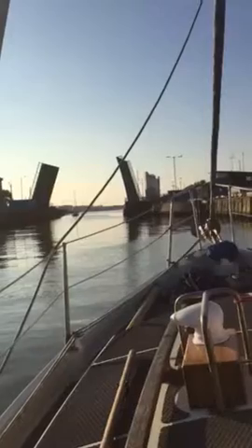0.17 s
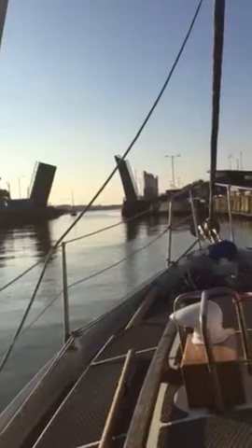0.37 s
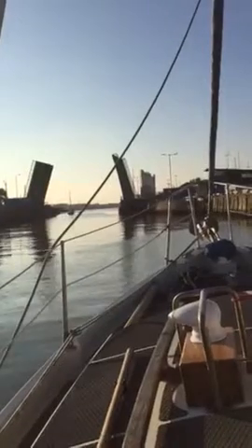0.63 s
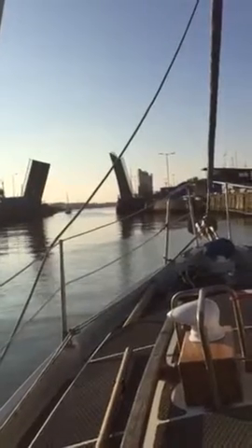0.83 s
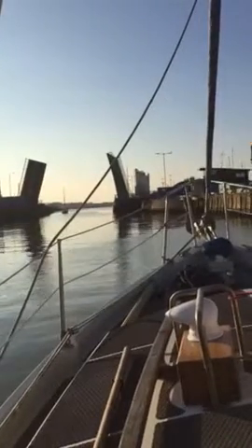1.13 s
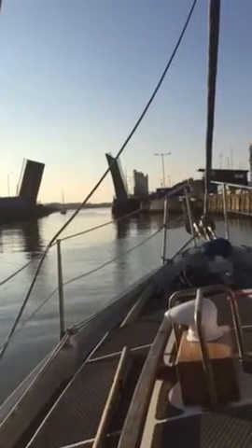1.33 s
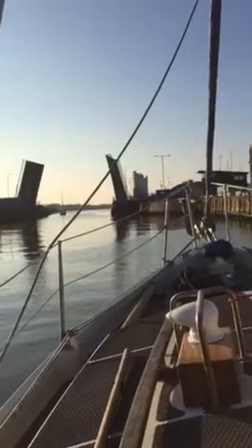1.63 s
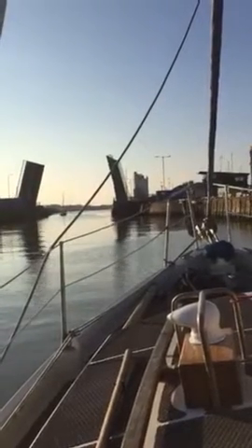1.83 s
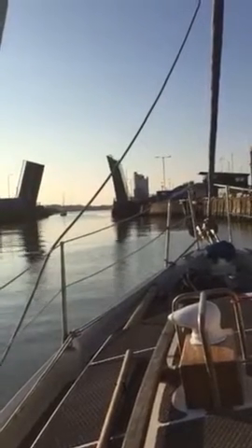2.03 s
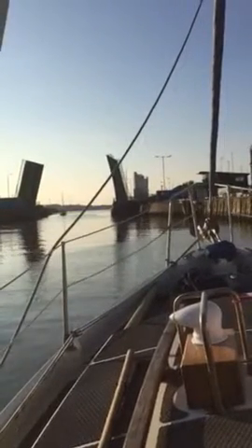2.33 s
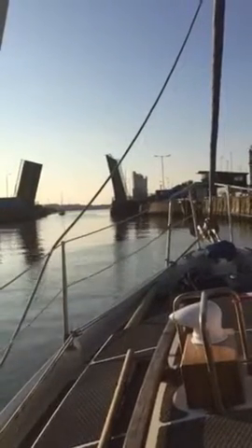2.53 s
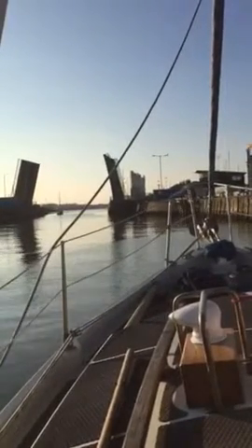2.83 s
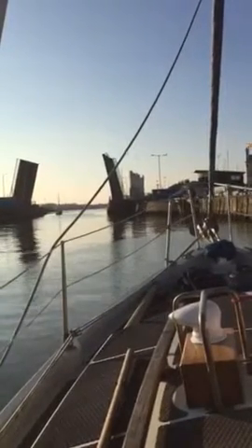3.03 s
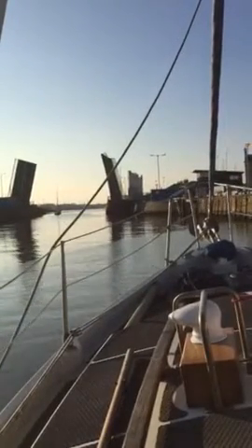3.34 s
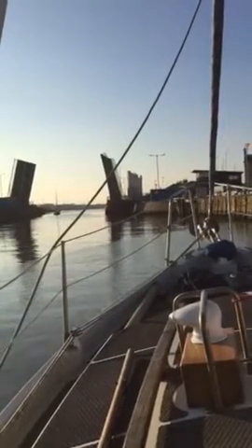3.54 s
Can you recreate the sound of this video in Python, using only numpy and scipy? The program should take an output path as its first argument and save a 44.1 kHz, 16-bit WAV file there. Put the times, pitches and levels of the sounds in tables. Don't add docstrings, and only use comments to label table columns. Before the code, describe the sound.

A small diesel rumbles low under a sailing boat's deck, knocking lightly, revs once near the middle, spits a little water and settles back; open calm harbour, one microphone on deck.

```python
import sys
import numpy as np
from scipy import signal
from scipy.fft import rfft, irfft, next_fast_len
from scipy.io import wavfile
from scipy.ndimage import uniform_filter1d, map_coordinates

SR = 44100
rng = np.random.default_rng(int(sys.argv[2]) if len(sys.argv) > 2 else 0)


def store_pcm(level_fs):
    pcm = np.round(np.clip(level_fs, -1, 1) * 32767).astype(np.int16)
    wavfile.write(sys.argv[1], SR, np.atleast_2d(pcm).T)


def voltage_ratio(decibels):
    exponent = np.asarray(decibels, float) / 20
    return 10 ** exponent


N = 162729

# [t/s, firing rate/Hz, exhaust level/dB, bark on upper orders/dB]
ENGINE = [(0, 22.1, -1, -3), (.1, 22.2, -1, -4), (.48, 23.5, 0, 0), (1.1, 23.8, -1, 0), (1.26, 29.3, -2, 0),
          (1.4, 33.6, 0, 4), (1.54, 39.9, -1, 8), (1.66, 44.7, -1, 8), (1.76, 47.4, 2.5, -1),
          (1.89, 42.7, 0, -6), (2, 39.8, 2, -4), (2.15, 36.4, -1, 0), (2.32, 33.5, -3, 6),
          (2.48, 31, -6, 3), (2.66, 28.5, 2, -3), (2.92, 24.7, -5, 2), (3.1, 23.6, 1, 0),
          (3.69, 23.3, -1, 2)]
# [t/s, level/dB]
LOAD = [(0, -44), (.2, -43), (.55, -46.5), (1.15, -42), (1.35, -43.5), (1.6, -41.5), (1.77, -39),
        (1.95, -40.5), (2.2, -47), (2.6, -49), (3, -46.5), (3.69, -45.5)]
# [t/s, level of upper orders/dB, width/s]
STUMBLES = [(.08, 0.5, 0.075), (1.317, -14.5, 0.019), (1.39, 3.5, 0.046), (1.47, -5, 0.017),
            (1.86, -11, .04), (1.95, 1.5, 0.023), (2.03, -16, 0.016), (2.12, 4, 0.035), (2.22, -4, 0.018),
            (2.399, 6.5, 0.015), (2.47, -5, 0.021), (2.68, 1.5, 0.048), (2.92, -11.5, 0.031),
            (3, 2.5, 0.016)]
ORDER_DB = [-28.5, -39, -40, -40, -49, -50]
ORDER_LAG = [0, .1, .45, .3, .9, .6]
BARK_SHARE = [0, .4, 1.2, .2, .5, .5]
# [f/Hz, level/dB]
PIPE = [(23, -38), (34, -16), (47, 0), (57, 5), (70, 4), (94, -1), (140, -7), (200, -11)]
# [f/Hz, level per Hz/dB]
ROAR = [(18, -26.5), (30, -22), (54, -11.5), (78, -2), (199, -9), (509, -26.5), (668, -27), (748, -42.5),
        (900, -48.5), (1170, -85), (1980, -120)]
# [f/Hz, level per Hz/dB]
BLOCK = [(290, 1.5), (500, -7.5), (648, -6), (1130, -7.5), (1240, -10), (2690, -17), (2850, -17),
         (5760, -34), (15500, -45.5)]
# [f/Hz, width/Hz, level/dB]
PANELS = [(1264, 110, -22), (1606, 25, -7)]
# [f/Hz, width/Hz, level/dB]
BUZZ = [(3500, 700, -2), (5800, 900, 0), (8100, 600, -11), (9500, 800, -10), (11600, 1000, -9)]
# [t/s, level/dB]
SHAKE = [(0, -23), (.42, -4), (.55, 5.5), (.68, 0), (1.05, 2), (1.17, 3), (1.28, -3), (1.36, -18),
         (1.71, -16), (1.74, 11.5), (1.78, 7), (1.805, -4), (1.87, 8), (1.92, 3), (2.1, -16), (3.05, -3.5),
         (3.2, 2), (3.69, -7)]
# [t/s, level/dB]
SPIT = [
    (1.8, -86),
    (1.85, -75),
    (1.875, -70),
    (1.893, -65),
    (1.903, -68),
    (1.912, -63.5),
    (1.94, -66.5),
    (1.965, -68.5),
    (2.0, -78),
]
# [f/Hz, level per Hz/dB]
SPRAY = [(1470, -26), (2500, -7), (3200, -7), (4240, -6), (5170, -12.5), (6070, -11), (11500, -17),
         (15500, -21)]
# [t/s, peak level/dB, f/Hz]
SPLATS = [
    (1.865, -58, 5750),
    (1.887, -52, 5960),
    (1.9062, -48.5, 4225),
    (1.96, -53, 2950),
]
# [t/s, peak level/dB, level of the hatch/dB]
KNOCKS = [(0.0813, -38, 7), (0.1158, -45, 25), (0.172, -38, 2.5), (0.212, -46.5, 14.5), (0.2629, -40.5, 7),
          (0.3036, -51, -1), (0.3546, -55, -5.5), (0.4784, -54.5, 1), (0.562, -47.5, 8), (0.7425, -52, -19),
          (0.8307, -36, -4), (0.9171, -37, 0), (0.958, -53, -3), (1, -43, 6.5), (1.2127, -39, 7.5),
          (1.292, -58, -8), (1.3754, -44.5, 15), (1.5879, -44.5, 13), (2.2291, -50, 10), (2.311, -45, 7),
          (3.2057, -54.5, -6), (3.4193, -40, -1), (3.506, -45, 7), (3.5938, -39, -1), (3.6854, -66, -13)]
# [f/Hz, level/dB, 60 dB decay/s]
FITTING = [(3670, 3, .016), (4400, -8, .008), (5300, -8, .008), (6020, -6, .012), (3100, -5, .008),
           (11600, -20, .012)]
# [f/Hz, level/dB, 60 dB decay/s]
HATCH = [(1150, 2, .022), (1860, -8, .014), (2300, -7, .012), (1450, -6, .012)]
# [t/s, peak level/dB, f/Hz]
TAPS = [
    (1.6288, -39, 1890),
    (1.7267, -34, 1994),
    (1.9907, -42, 1470),
    (2.0935, -48, 2000),
]
# [share of its pitch, level/dB, 60 dB decay/s]
TAP = [(1, 0, .018), (.31, -2, .022), (.6, -2, .014), (1.75, -6, .01), (2.1, -11, .01), (.83, -4, .012)]
# [t/s, peak level/dB]
CLINKS = [
    (2.878, -55.5),
    (3.0347, -51.5),
]
# [f/Hz, level/dB, 60 dB decay/s]
SHACKLE = [(5650, 0, .05), (5900, -2, .06), (6250, -8, .06), (4130, -7, .04), (8600, -12, .05),
           (11700, -11, .03)]
# [start t/s, length/s, which whine, level/dB]
WHINES = [(.06, .14, 0, -76), (0.257, 0.06, 0, -76), (.38, 0.091, 0, -74), (.6, 0.23, 0, -87),
          (0.822, 0.12, 0, -70), (.95, 0.1, 0, -78), (1.11, 0.1, 0, -75), (1.278, 0.074, 0, -72),
          (1.442, .1, 0, -70.5), (1.667, 0.18, 0, -75), (1.97, 0.15, 0, -71.5), (2.12, 0.47, 0, -81.5),
          (2.46, .26, 0, -71), (2.74, .2, 0, -80), (2.95, .2, 0, -72), (3.1, .21, 0, -71),
          (3.45, .24, 0, -77), (0, 0.068, 1, -75), (0.134, 0.054, 1, -73), (0.383, .12, 1, -82),
          (0.547, .15, 1, -91), (.73, 0.29, 1, -79), (.95, .22, 1, -92)]
WHINE_HZ = [2566, 2867]
# [start t/s, length/s, f/Hz, level/dB]
HUMS = [(2.13, .05, 1195, -64), (2.215, .035, 1185, -62), (2.42, .08, 1155, -63), (2.61, .08, 1130, -65),
        (2.7, .06, 1170, -68), (2.95, .05, 1120, -68), (2.38, .03, 1370, -65), (2.37, .05, 1690, -69),
        (1.87, .13, 1560, -69), (1.08, .12, 1590, -70), (.015, .03, 1150, -62), (3.04, .03, 760, -62)]
# [start t/s, length/s, f/Hz, glide/Hz, level/dB]
PEEPS = [
    (1.306, 0.059, 3580, -20, -66.5),
    (1.39, 0.037, 5100, 303, -80),
    (1.67, 0.06, 4950, -23, -75.5),
    (2.245, 0.078, 1850, 0, -61),
    (2.495, 0.086, 3660, -60, -67),
    (2.562, .03, 4320, 21, -81),
    (2.586, 0.037, 5020, 109, -74.5),
    (2.6, 0.098, 5500, -42, -80.5),
    (2.635, 0.054, 1790, -75, -67),
    (2.9, 0.13, 4830, -130, -80),
]

BLOCK_PATCHY_DB, DULL_HZ = 1.2, 5300


def unit(x):
    return x / np.sqrt(np.mean(x ** 2) + 1e-20)


def along(points, hz):
    f, v = np.transpose(points)
    return np.interp(np.log(hz + 1), np.log(f + 1), v)


def peaks(resonances, f):
    return sum(voltage_ratio(db) / (1 + (2 * (f - centre) / width) ** 2) for centre, width, db in resonances)


def curves(rows):
    s, *columns = np.transpose(rows)
    return [np.interp(np.arange(N) / SR, s, c) for c in columns]


def wobble(rate):
    knots = rng.standard_normal(int(N * 40 / SR) + 4)
    return map_coordinates(knots, [np.arange(N) * rate / SR])


def rush(gain, patchy_db):
    z = signal.stft(rng.standard_normal(N + 512), nperseg=512)[2]
    patches = uniform_filter1d(rng.standard_normal(z.shape), size=5, axis=0)
    patches = uniform_filter1d(patches, size=10, axis=1)
    x = signal.istft(z * voltage_ratio(patchy_db * unit(patches)), nperseg=512)[1][:N]
    m = next_fast_len(N + 8192)
    return unit(irfft(rfft(x, m) * gain(np.fft.rfftfreq(m, 1 / SR)), m)[:N])


def add(track, s, sound):
    track[round(s * SR):][:len(sound)] += sound


def firing_pulse(turns, sharp):
    return unit(np.exp(sharp * np.cos(2 * np.pi * (turns - .15))))


def exhaust(turns, rate, open_db, bark_db):
    rough = 1 + .18 * np.minimum(np.abs(rate - rate[-1]), 10)

    def tone(k, db, lag):
        level_db = db + open_db + along(PIPE, k * rate) + 1.2 * np.sqrt(rough) * wobble(14)
        drift = .017 * np.sqrt(k) * rough * wobble(13)
        return np.sqrt(2) * voltage_ratio(level_db) * np.cos(2 * np.pi * (k * turns - lag + drift))

    t = np.arange(N) / SR
    stumble_db = sum(db * np.exp(-((t - s) / width) ** 2) for s, db, width in STUMBLES)
    out = np.zeros(N)
    for k, (db, lag, share) in enumerate(zip(ORDER_DB, ORDER_LAG, BARK_SHARE)):
        out += tone(k + 1, db + share * bark_db + (k > 0) * stumble_db, lag)
    for k in range(2, 7):
        out += tone(k + .5, -51, rng.random())
    return out


def hull_roar(beat, load_db):
    level = voltage_ratio(load_db + 4 + 0.95 * wobble(8.89))
    colour = [(13, -47)] + ROAR + [(2000, -88)]
    return level * (1 + 0.3 * beat) * rush(lambda f: voltage_ratio(along(colour, f)), patchy_db=1.22)


def block_clatter(beat, load_db):
    def colour(f):
        panels = 1 + voltage_ratio(8.5) * peaks(PANELS, f)
        return voltage_ratio(along([(250, -3.0)] + BLOCK, f)) * panels / np.hypot(1, (f / DULL_HZ) ** 2)

    level = voltage_ratio(-58 + 0.81 * (load_db - load_db.mean()) + 0.23 * wobble(2.0))
    return level * (1 + 0.16 * beat) * rush(colour, BLOCK_PATCHY_DB)


def loose_buzz(turns):
    shake_db, = curves(SHAKE)
    level = voltage_ratio(-77 + shake_db + 1.5 * wobble(25))
    return level * firing_pulse(turns, .5) * rush(lambda f: peaks(BUZZ, f), patchy_db=3)


def engine():
    rate, open_db, bark_db = curves(ENGINE)
    load_db, = curves(LOAD)
    turns = np.cumsum(rate) / SR
    beat = firing_pulse(turns, 0.47) - 1
    body = hull_roar(beat, load_db) + block_clatter(beat, load_db)
    return exhaust(turns, rate, open_db, bark_db) + body + loose_buzz(turns)


def gurgle():
    out, t = np.zeros(N + SR), np.arange(SR // 40) / SR
    for when, a, b in rng.random((500, 3)):
        hz = 1210.6 * np.exp(0.235 * 4 * (a - .5))
        u = t * hz / 10
        bubble = u * np.exp(1 - u * 2) * np.sin(2 * np.pi * hz * t)
        add(out, when * N / SR, voltage_ratio(-61.5 + 10 * b) * bubble)
    load_db, = curves(LOAD)
    return out[:N] * voltage_ratio(load_db - load_db.mean())


def water():
    flow_db, = curves([(1.72, -110)] + SPIT + [(2.06, -100)])
    colour = [(1200, -21)] + SPRAY
    level = voltage_ratio(flow_db + 6 + 1.4 * wobble(35))
    return level * rush(lambda f: voltage_ratio(along(colour, f)), patchy_db=1.2)


def ring(modes, t, pitch=1):
    out = np.zeros(len(t))
    for hz, db, t60 in modes:
        a, b = rng.standard_normal(2)
        fade = voltage_ratio(db + 2 * a - 60 * t / t60)
        out += fade * np.sin(2 * np.pi * hz * pitch * (1 + 0.0077 * b) * t)
    return out


def strike(body, t, chatter_s, tail_db, tail_s, crack_db, soft=1):
    burst = (t / chatter_s) ** 2 * np.exp(1 - t / chatter_s) / 2
    tail = voltage_ratio(tail_db) * (1 - np.exp(-t / chatter_s)) ** 2 * np.exp(-t / tail_s)
    push = uniform_filter1d(rng.standard_normal(len(t)) * (burst + tail), size=soft)
    crack = voltage_ratio(crack_db) * np.exp(-t / .00011)
    sound = signal.fftconvolve(push, body + crack)[:len(t)]
    return sound / np.abs(sound).max()


def knocks():
    out, t = np.zeros(N + SR), np.arange(SR // 8) / SR
    lead = .0022
    for s, db, low_db in KNOCKS:
        body = ring(FITTING, t) + voltage_ratio(low_db) * ring(HATCH, t)
        add(out, s - lead, voltage_ratio(db) * strike(body, t, 0.0013, -9, 0.014, 5))
    for s, db, hz in TAPS:
        add(out, s - lead, voltage_ratio(db + 2) * strike(ring(TAP, t, hz), t, .002, -10, .018, -14, soft=6))
    for s, db, hz in SPLATS:
        add(out, s - lead, voltage_ratio(db) * strike(ring(TAP[:1], t, hz), t, .002, -10, .008, -6))
    for s, db in CLINKS:
        add(out, s - lead, voltage_ratio(db + 2) * strike(ring(SHACKLE, t), t, .003, -9, .015, 17))
    return out[:N]


def pump():
    t, swell = np.arange(N) / SR, np.full((2, N + SR), voltage_ratio(-83))
    for s, length, which, db in WHINES:
        add(swell[round(which)], s, voltage_ratio(db) * np.hanning(round(length * SR)) ** 0.31)
    out = np.zeros(N)
    for hz, gain in zip(WHINE_HZ, swell):
        level = gain[:N] * voltage_ratio(2 * wobble(30.15))
        out += level * np.sin(2 * np.pi * (hz * t + 0.11 * wobble(17)))
    return np.sqrt(2) * out


def peeps_and_hums():
    out = np.zeros(N + SR)
    hums = [(s, length, hz, 0, db) for s, length, hz, db in HUMS]
    for s, length, hz, glide, db in list(PEEPS) + hums:
        u = np.arange(round(length * SR)) / SR
        waver = voltage_ratio(1.5 * np.interp(u, np.linspace(0, length, 6), rng.standard_normal(6)))
        shape = np.sin(np.pi * u / length) ** 0.5
        tone = np.sin(2 * np.pi * (hz * u + glide * u ** 2 / (2 * length)))
        add(out, s, np.sqrt(2) * voltage_ratio(db) * waver * shape * tone)
    return out[:N]


def harbour_hiss():
    return voltage_ratio(-74.5) * rush(lambda f: voltage_ratio(along(BLOCK, np.maximum(f, DULL_HZ))), BLOCK_PATCHY_DB / 2)


def scene():
    boat = engine() + gurgle() + water() + knocks()
    return (boat + pump() + peeps_and_hums() + harbour_hiss())[None]


def top_cut(x):
    return signal.sosfilt(signal.butter(12, 15680, fs=SR, output="sos"), x)


def record(dry):
    m = next_fast_len(N + 8192)
    keep = np.fft.rfftfreq(m, 1 / SR) < 15750
    mix = irfft(rfft(dry, m) * keep, m)[:, :N]
    return top_cut(mix)


dry = scene()
out = record(dry)
store_pcm(out)
```